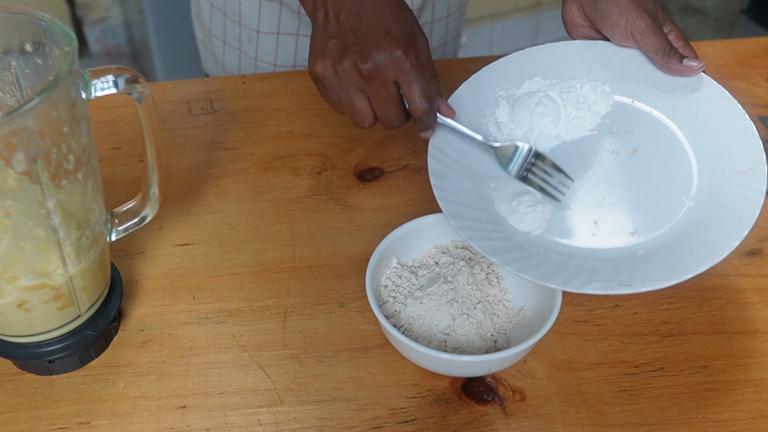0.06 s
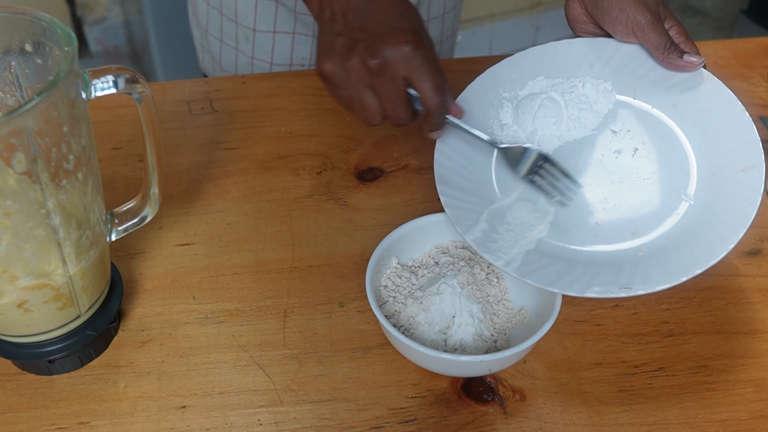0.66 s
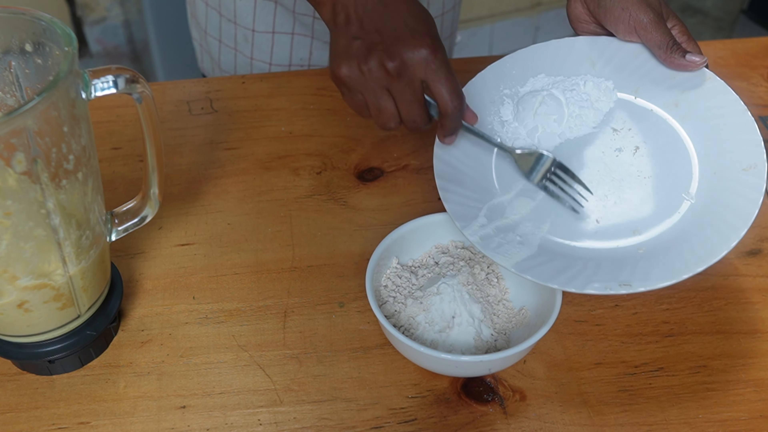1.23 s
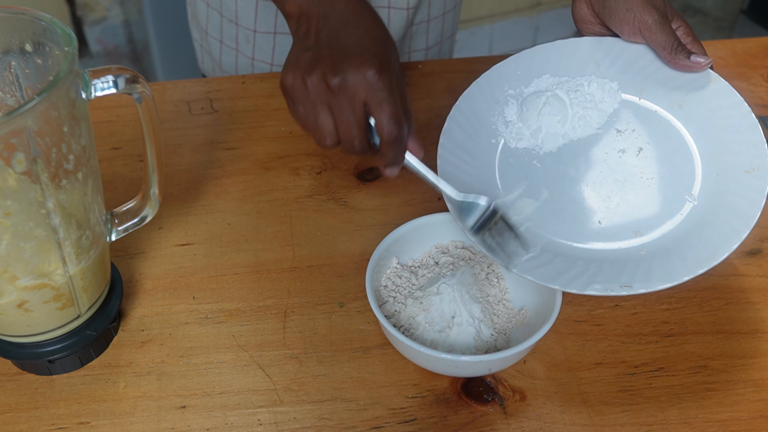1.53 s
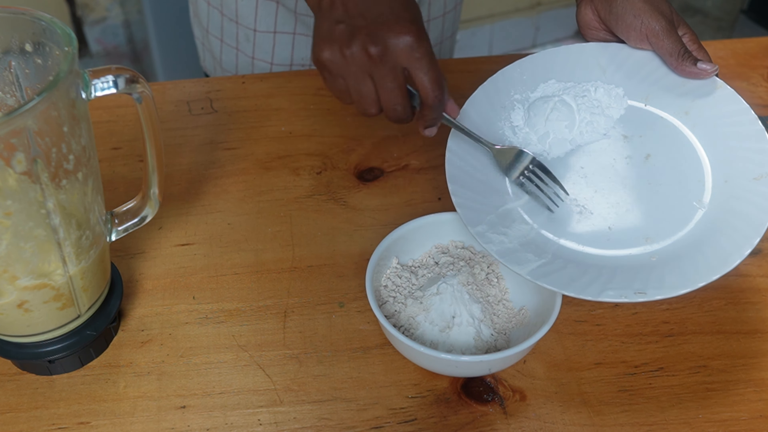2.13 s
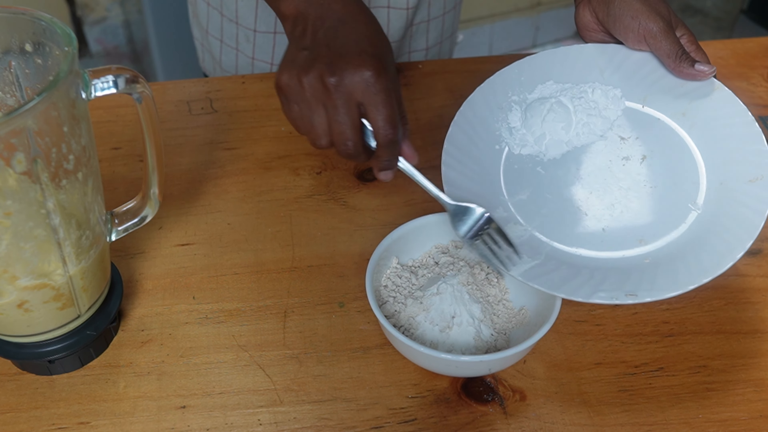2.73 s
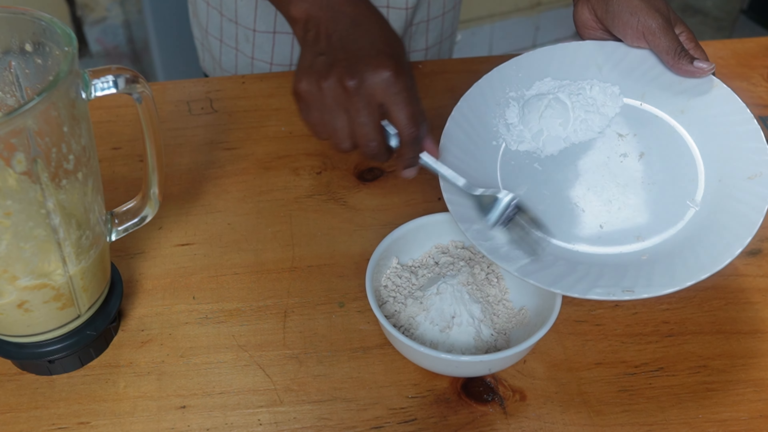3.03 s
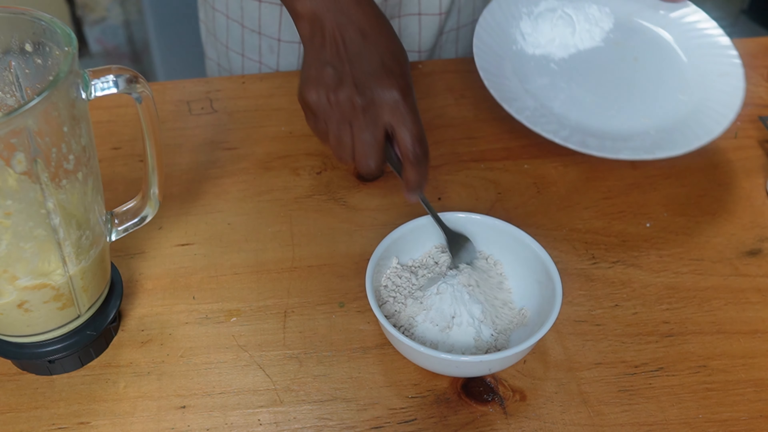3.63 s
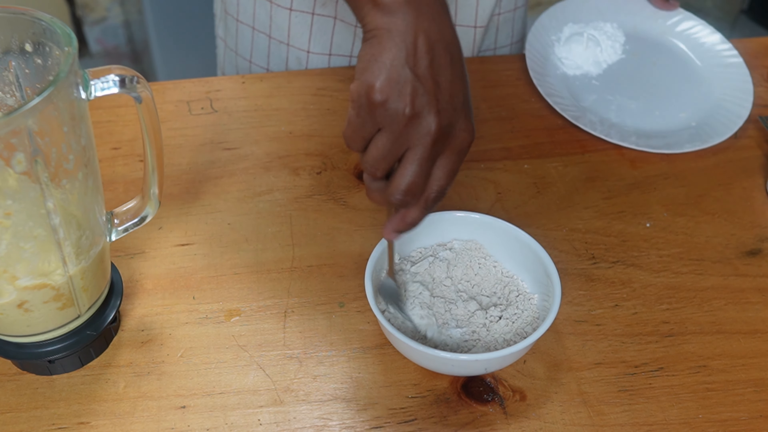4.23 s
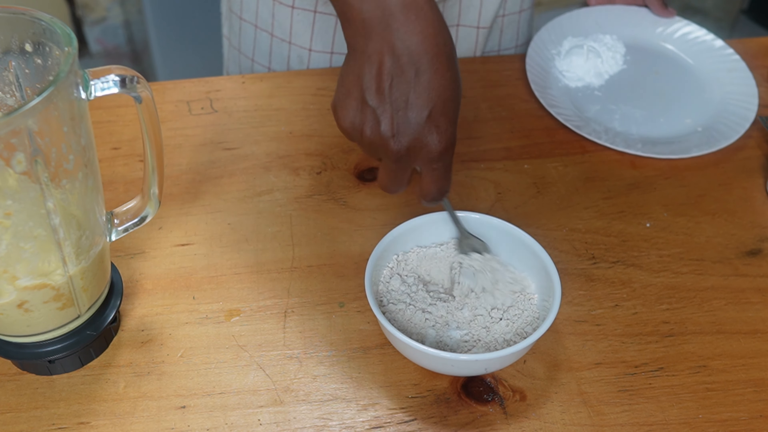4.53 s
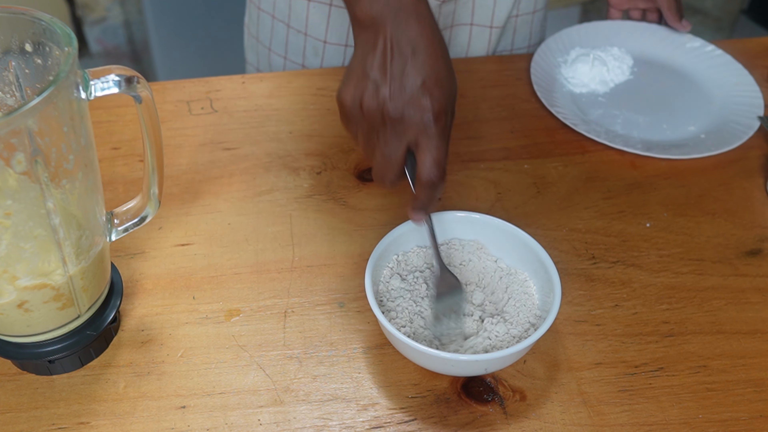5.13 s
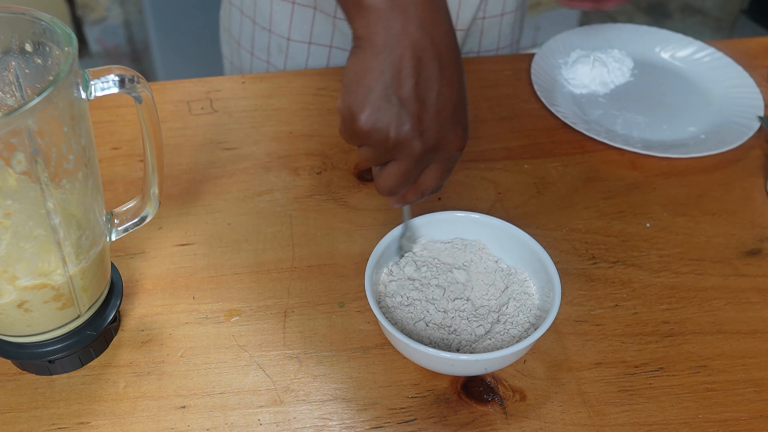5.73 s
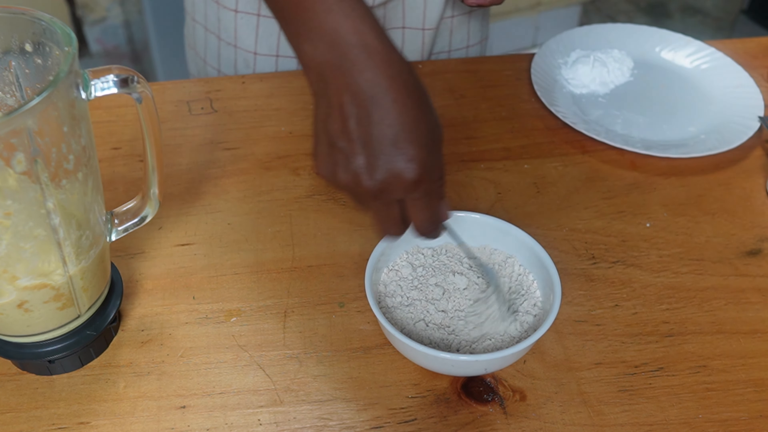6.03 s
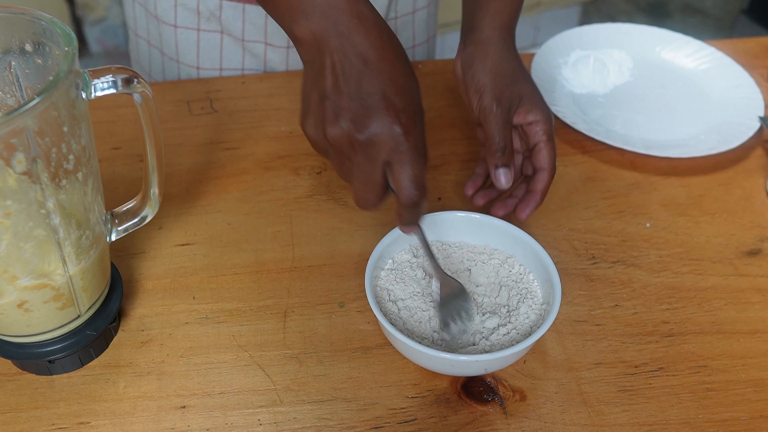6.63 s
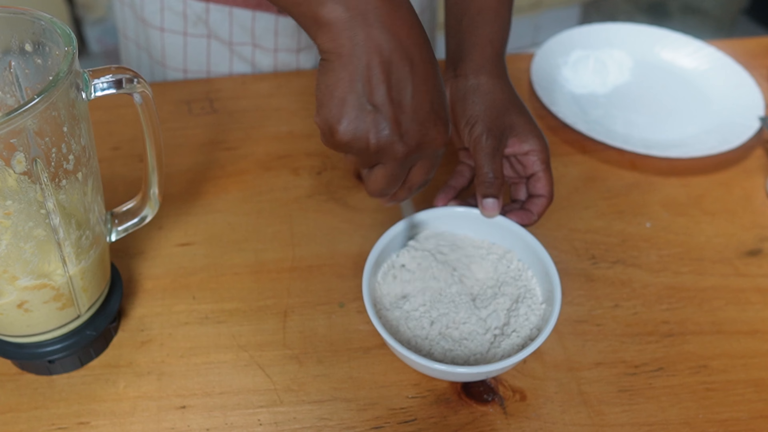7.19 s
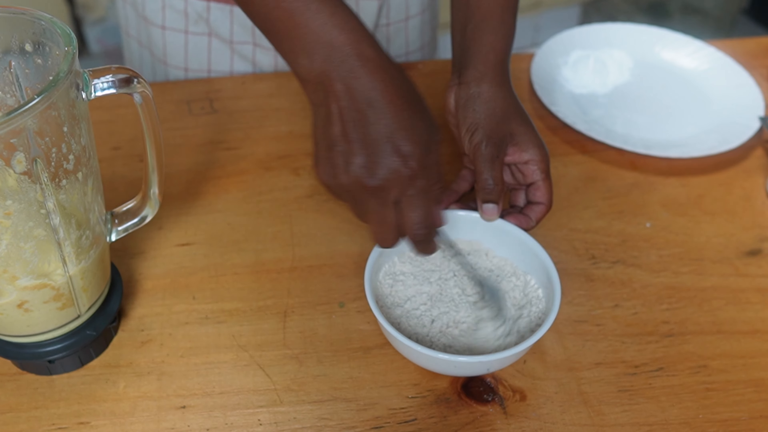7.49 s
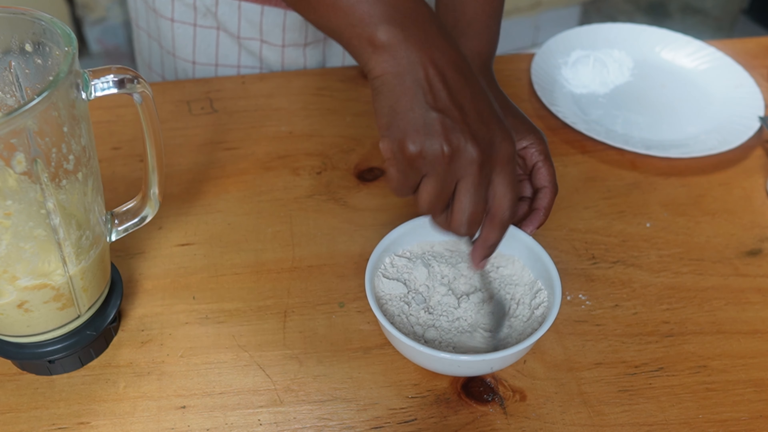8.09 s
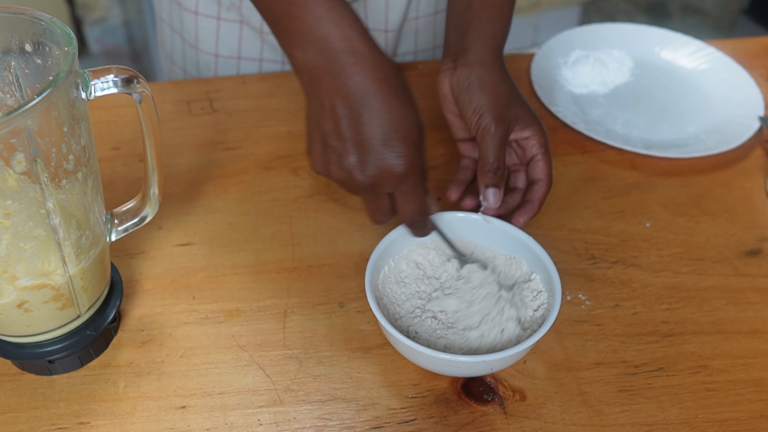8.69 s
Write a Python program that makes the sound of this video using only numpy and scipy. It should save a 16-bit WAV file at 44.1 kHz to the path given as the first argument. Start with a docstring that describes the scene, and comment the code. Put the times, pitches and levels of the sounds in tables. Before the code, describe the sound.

A metal fork knocks and scrapes flour off a ceramic plate, then stirs it in a bowl with clinks and squeaks.

```python
"""In a hard-walled kitchen, a metal fork pushes flour off a ceramic plate in short strokes,
each a knock and then a gritty, chattering scrape. The fork then stirs the flour in a bowl,
which knocks and shuffles on a wooden table; the tines tinkle and now and then stick and slip
on the glaze with a squeak. The walls answer, and a motor drones faintly far away."""
import sys
import numpy as np
from scipy import signal
from scipy.fft import rfft, irfft, next_fast_len
from scipy.io import wavfile
from scipy.ndimage import uniform_filter1d

SR = 44100
rng = np.random.default_rng(int(sys.argv[2]) if len(sys.argv) > 2 else 0)


def transcribe(signal):
    """Save signal, clipped to [-1, 1], as a 16-bit WAV file at the path in sys.argv[1]."""
    frames = np.atleast_2d(signal).T
    limited = np.clip(frames, -1, 1)
    pcm = np.round(limited * 32767).astype(np.int16)
    wavfile.write(sys.argv[1], SR, pcm)


N = 385875
TIME = np.arange(N) / SR
RING_TIME = TIME[:SR // 3]
STIR_FROM_S = 4.1

# The fork's ring. Each row: frequency in Hz, level in dB, seconds to fall 60 dB.
FORK_MODES = [(533, -12.5, 0.17), (1734, -10.5, 0.23), (2880, 8, 0.14), (3034, 4.5, 0.11),
              (3840, -7, 0.057), (4775, 0.5, 0.05), (5500, -12.5, 0.17), (6780, -10.5, 0.14),
              (8100, -17, 0.15), (9260, -23, 0.34), (10440, -9, 0.22), (12040, -24, .15), (13080, -22, .15),
              (14300, -26.5, 0.107)]
# The tone of a tine's attack. Each row: frequency in Hz, level in dB.
FORK_ATTACK = [(120, -25), (600, 1.5), (1300, 1), (2300, 6), (3000, 7.5), (4200, -14.5), (7000, -13.5),
               (11000, -20), (16000, -32)]


def plate_knocks(contact_s, ring_db):
    """The fork lands on the hand-held plate and sets it ringing."""
    # Each row: start in seconds, mid level in dB, bass and treble in dB against the mids.
    landings = [(0.066, -48.5, -0.5, -9), (0.772, -38.5, -11, -14.5), (1.309, -39.5, -9, -14),
                (1.767, -44.5, -7.5, -17), (2.204, -45, -16, -0.5), (2.591, -41.5, -11.5, -11.5),
                (2.991, -38.5, -22, -13.5), (3.147, -33.5, -18, -6)]
    # The plate's ring. Each row: frequency in Hz, level in dB, seconds to fall 60 dB.
    modes = [(345, -11.5, 0.31), (464.4, -8, 0.08), (592, 0.5, 0.055), (776, -3.5, 0.079), (1183, 1, 0.042),
             (1358, -1, 0.021), (1530, -2.5, 0.059), (1610, -20, 0.016), (1670, -22, 0.028),
             (2270, -9, 0.13), (2668, 1.5, 0.028), (2880, -15.5, 0.066), (3290, 0.5, 0.039),
             (5360, -53, 0.013), (6070, -28, 0.08), (6850, -14.5, 0.038), (8600, -23, .03)]
    # The tone of the attack. Each row: frequency in Hz, level in dB.
    attack = [(120, -104), (400, -15), (1200, -5.5), (2000, 7.5), (3300, -3), (5000, -6), (8000, -13.5),
              (16000, -29.5)]
    out = np.zeros(N)
    for s, db, bass_db, treble_db in landings:
        add(out, s, amp(db) * blow(modes, attack, contact_s, ring_db, bass_db, treble_db))
    return out


def plate_scrapes(jitter, flutter_db, fade_s, upper_ratio, upper_db):
    """Two tines chatter, each at its own pitch, over crunching flour; both grow towards the rim."""
    # Each row: landing, hardest push and lift in seconds, chatter and grit in dB at that push,
    # chatter pitch at the rim in Hz.
    strokes = [(0.07, 0.335, 0.39, -31, -37.5, 2780), (0.78, 0.98, 1.005, -39, -40.5, 2820),
               (1.32, 1.474, 1.56, -44, -45, 2760), (1.78, 1.927, 1.988, -36.5, -42, 2705),
               (2.21, 2.325, 2.39, -36.5, -40, 2750), (2.60, 2.70, 2.805, -38.5, -44, 2720),
               (3.15, 3.252, 3.285, -38, -39, 2690)]
    chatter_rise, chatter_fall, grit_rise, grit_fall = 162, 147, 81.5, 43   # dB per second
    skid_db, skid_s = -9.5, 0.024   # a puff of grit as the fork lands
    start_hz, glide_s = 1978, [0.05, 0.14]   # the pitch climbs between these times before the push
    chatter, grit, pitch = np.zeros((3, N))
    for lands, hardest, lifts, chatter_db, grit_db, rim_hz in strokes:
        on = slice(int(lands * SR), int((lifts + fade_s) * SR))
        before, after = np.maximum(hardest - TIME[on], 0), np.maximum(TIME[on] - hardest, 0)
        touching = np.clip((lifts - TIME[on]) / fade_s + 1, 0, 1)
        chatter[on] = touching * amp(chatter_db - chatter_rise * before - chatter_fall * after)
        grit[on] = touching * amp(grit_db - grit_rise * before - grit_fall * after)
        grit[on] += amp(grit_db + skid_db) * np.exp(-np.abs(TIME[on] - lands) / skid_s)
        pitch[on] = np.interp(before, glide_s, [rim_hz, start_hz])
    lower, upper = (np.sin(phase_of(ratio * pitch, jitter * drift(800))) * drift(500)
                    for ratio in (1, upper_ratio))
    tines = np.sqrt(2) * (lower + amp(upper_db) * upper)
    # The tone of the grit. Each row: frequency in Hz, level in dB.
    grit_tone = [(150, -31), (400, -11.5), (800, -4.5), (1700, -7), (2800, -7.5), (3600, -2), (4800, -7),
                 (7000, -8.5), (11500, -13.5), (16000, -20.5)]
    crunch = rms_one(colour(grains(2600, spread_db=1.5), grit_tone))
    grip = rms_one(amp(flutter_db * drift(160)))   # the tines catch and let go
    return grip * (chatter * tines + grit * crunch)


def squeaks(jitter, flutter_db, slip_rate):
    """A tine sticks and slips on the glaze: a harsh tone, unsteady in pitch and strength."""
    # Each row: centre and half length in seconds, pitch in Hz, level in dB,
    # octave and rasp in dB against the fundamental.
    slips = [(0.205, .015, 1807, -36, -7, -9.5), (0.27, .002, 2640, -23.5, -17, -7.5),
             (0.336, .006, 2740, -27, -11, -6.5), (0.381, 0.012, 3300, -31.5, -11, -3),
             (0.982, .008, 2750, -33, -14, -3), (2.318, .0015, 2690, -23, -20, -15),
             (2.33, .002, 2750, -24, -15, -6.5), (3.286, 0.0028, 2716, -28, -19, -22),
             (3.715, .018, 1007, -24, -14, -22), (4.031, 0.019, 1033, -25, -6.5, -19),
             (5.155, 0.018, 2630, -18.5, 4.5, -9.5), (5.137, .015, 2482, -27.5, 10, -6),
             (5.151, 0.0068, 2900, -22.5, -8.5, -5), (6.259, .03, 959, -50, -3, -16),
             (6.409, .009, 1061, -33, -2, -12.5), (6.459, .04, 1078, -47, 7, -9),
             (7.308, 0.019, 2700, -45.5, -2, -1), (7.82, .01, 1023, -42.5, -27, -20),
             (8.141, .004, 2097, -36, -23, -8), (8.466, .015, 2850, -39, -26, 0),
             (8.471, .002, 3760, -22, -18, -7.5)]
    # The tone of the rasp. Each row: frequency in Hz, level in dB.
    rasp_tone = [(300, -23), (1500, -7), (3000, 6.5), (5000, -0.5), (8000, -7), (13500, -6), (16000, -49)]
    tilt_db_per_khz = -5.5   # overtones fall away above the octave
    out, wander, grip = np.zeros(N), drift(slip_rate), amp(flutter_db * drift(420))
    for s, half, hz, db, octave_db, rasp_db in slips:
        on, force = swell(s, half)
        phase = phase_of(hz, jitter * wander[on])
        step_db = tilt_db_per_khz * hz / 1000
        overtones = sum(amp(octave_db + step_db * (k - 2)) * np.sin(k * phase) for k in range(2, 6))
        rasp = amp(rasp_db) * rms_one(colour(rng.standard_normal(len(phase)), rasp_tone))
        press = force * grip[on]
        press *= np.linalg.norm(force) / np.linalg.norm(press)
        out[on] += amp(db) * press * (np.sin(phase) + overtones + rasp)
    return out


def pressed_tines(friction, ring_db, damping_s):
    """Friction also shakes the fork's high modes, which die quickly while it is pressed down."""
    tines = band(ringing(FORK_MODES), 3900, "high", order=4) * np.exp(-RING_TIME / damping_s)
    return friction + amp(ring_db) * resonate(friction, tines)


def bowl_knocks(contact_s, ring_db, rock_s, rock_db):
    """The fork drives the bowl against the table; it rocks back more softly."""
    # Each row: start in seconds, mid level in dB, bass and treble in dB against the mids.
    knocks = [(3.67, -37.5, 2, -20), (3.681, -30.5, -9, -13.5), (3.832, -56.5, 10, -8),
              (3.948, -39, -2.5, -9), (4.065, -38, -4.5, -24), (4.8, -65, 16.5, -25),
              (4.86, -45.5, 1.5, -9.5), (5.367, -42, 0.5, -9.5), (6.767, -38, -6.5, -5),
              (6.921, -54, 6, -5.5), (7.566, -57.5, 3.5, -27), (7.9, -57.5, 11.5, -13),
              (8.159, -62, 11.5, -25)]
    # The bowl's ring. Each row: frequency in Hz, level in dB, seconds to fall 60 dB.
    modes = [(235.5, -2.5, 0.22), (322, -12.5, 0.037), (354, -3.5, 0.094), (519, -23, 0.35), (540, 1, 0.09),
             (619.4, 2.5, 0.074), (793, -25.5, 0.068), (843, 1.5, 0.077), (1054, -9, 0.1),
             (1920, -0.5, 0.022), (2210, -9, 0.046), (2840, -9, 0.029), (4110, -11.5, 0.03),
             (4294, -9.5, 0.055), (4520, -25.5, .04)]
    # The tone of the attack. Each row: frequency in Hz, level in dB.
    attack = [(40, -32), (100, -32), (220, 10.5), (600, 5.5), (1050, 1.5), (1450, -8.5), (2200, -5.5),
              (4200, -16), (6500, -33.5), (16000, -60.5)]
    out = np.zeros(N)
    for s, db, bass_db, treble_db in knocks:
        for delay_s, loss_db in (0, 0), (rock_s, rock_db):
            knock = blow(modes, attack, contact_s, ring_db, bass_db, treble_db)
            add(out, s + delay_s, amp(db + loss_db) * knock)
    return out


def bowl_shuffle(jitter, table_db, stir_push_db):
    """The bowl's foot slips in a nearly regular judder and drums on the table top."""
    # Each row: centre and half length in seconds, level in dB, slips per second.
    shuffles = [(1.747, 0.0054, -51, 160), (2.56, 0.0089, -51, 182), (5.163, .009, -36, 245),
                (5.241, .045, -35.5, 380), (5.291, .021, -45, 240), (5.455, 0.013, -36.5, 395),
                (6.253, 0.016, -46.5, 234), (7.293, .03, -46, 555), (7.61, .025, -40.5, 305),
                (7.988, 0.014, -36.5, 353), (8.159, 0.0438, -47, 240), (8.45, 0.083, -47, 179)]
    # The foot on the wood. Each row: frequency in Hz, level in dB, seconds to fall 60 dB.
    table_modes = [(195, -2.5, 0.23), (232, -11.5, 0.63), (333.5, -3, 0.097), (420, 4.5, 0.016),
                   (514, 4.5, 0.035), (565, -4, 0.038)]
    push = amp(stir_push_db) * (TIME > STIR_FROM_S)
    judder, wander = np.zeros(N), drift(150)
    for s, half, db, hz in shuffles:
        on, force = swell(s, half)
        push[on] += amp(db) * force
        judder[on] += amp(db) * force * np.sin(phase_of(hz, jitter * wander[on]))
    jerks = rms_one(grains(600, spread_db=-1.0)) * push
    return judder + amp(table_db) * resonate(jerks, ringing(table_modes))


def tine_clicks(contact_s, bass_db):
    """Pressed tines only click on the glaze; those that spring free ring on, each at its own pitch."""
    # Each row: start in seconds, mid level in dB, treble against mids in dB,
    # ring against attack in dB, tuning in Hz.
    clicks = [(4.412, -64.5, -0.5, -1, 3000), (4.63, -77, -8, 7, 3060), (4.981, -45, -1.5, -6.5, 3310),
              (5.07, -49.5, -19, -11, 2960), (5.805, -52, -2.5, 6.5, 3125), (5.824, -53, -9, 13, 3120),
              (6.207, -62, -14, -12, 2980), (7.059, -75, 7.5, 3, 3080), (7.234, -60, -2.5, 1, 2976),
              (7.285, -55, -7, 6, 2920), (7.433, -61, -16, 6, 2790), (7.956, -59, -7, -5, 2855),
              (8.135, -57, -7.5, -18, 3085), (8.332, -51, -9, -8, 3260), (8.434, -57, 7.5, -2, 3085)]
    home_hz = 3094   # the tuning that leaves the fork's modes unshifted
    out = np.zeros(N)
    for s, db, treble_db, ring_db, hz in clicks:
        modes = np.array(FORK_MODES) * [hz / home_hz, 1, 1]
        add(out, s, amp(db) * blow(modes, FORK_ATTACK, contact_s, ring_db, bass_db, treble_db))
    return out


def tinkles(per_s, level_db, spread_db, detune):
    """While the fork stirs, its tips brush the bowl at random and ring faintly and high."""
    out = np.zeros(N)
    for s in TIME[(rng.random(N) < per_s / SR) & (TIME > STIR_FROM_S)]:
        loud, sharp = rng.standard_normal(2)
        modes = np.array(FORK_MODES) * [1 + detune * sharp, 1, 1]
        touch = blow(modes, FORK_ATTACK, contact_s=.002, ring_db=0, bass_db=-12, treble_db=2.5)
        add(out, s, amp(level_db + spread_db * loud) * touch)
    return out


def flour(stir_db, ring_db):
    """Stirred powder rustles, soft and dense, and keeps the tines faintly singing."""
    # The fork digs deeper. Each row: centre and half length in seconds, level in dB.
    digs = [(4.165, 0.074, -54), (5.15, 0.14, -44.5), (6.462, .1, -48), (6.942, 0.15, -57),
            (7.699, 0.078, -50.5)]
    # The tone of the rustle. Each row: frequency in Hz, level in dB.
    rustle_tone = [(200, 1.5), (700, 9), (1500, 0), (2800, 0), (4500, 1), (7000, -10.5), (11000, -16.5),
                   (16000, -26)]
    depth = amp(stir_db) * (TIME > STIR_FROM_S)
    for s, half, db in digs:
        on, force = swell(s, half)
        depth[on] += amp(db) * force
    powder = grains(7000, spread_db=4.5)
    singing = rms_one(resonate(powder, ringing(FORK_MODES)))
    return depth * (rms_one(colour(powder, rustle_tone)) + amp(ring_db) * singing)


def kitchen(x, first_echo_s, build_s):
    """Dense wall echoes die at their own pace in each octave."""
    # Each row: frequency in Hz, seconds for the tail to fall 60 dB.
    decay_times = [(150, 1), (530, 0.19), (1100, 0.39), (2100, 0.35), (3500, 0.3), (8000, 0.29),
                   (15000, 0.21)]
    # Each row: frequency in Hz, reverb level in dB against its input.
    wet_levels = [(150, -6), (530, -4), (1400, 0), (3500, -2.5), (8000, 1), (15000, -1.5)]
    t = TIME[:SR * 3 // 4]
    noise, hz = rfft(diffuse(len(t))), np.fft.rfftfreq(len(t), 1 / SR)
    octave, response = np.log2(np.maximum(hz, 1)), 0
    build = np.clip((t - first_echo_s) / build_s, 0, 1)
    for centre in 125 * 2 ** np.arange(8):
        share = np.clip(1 - np.abs(octave - np.log2(centre)), 0, 1)
        decay = np.exp(-np.log(1000) * t / at_hz(decay_times, centre)) * build
        tail = irfft(noise * share, len(t)) * decay / np.linalg.norm(decay)
        response = response + tail * amp(at_hz(wet_levels, centre))
    return signal.fftconvolve(x[None], response, axes=1)[:, :N]


def motor(overtone_db, rumble_db):
    """A far motor drones low and uneven, slowly speeding up and dropping back near the end."""
    # Each row: time in seconds, pitch in Hz, level in dB, octave in dB against the fundamental.
    drone = [(0, 35, -79, 8), (4.0, 42, -80, 13), (5.15, 45, -53, -10), (6.5, 47, -56, -19),
             (7.2, 49, -58.5, 4), (7.8, 51, -64, 1), (7.9, 50, -74, 7), (8.2, 33.1, -75, 6),
             (8.75, 35.3, -62, 7.5)]
    s, hz, db, octave_db = np.transpose(drone)
    phase = phase_of(np.interp(TIME, s, hz), 0.0088 * drift(7.1))
    octave = amp(np.interp(TIME, s, octave_db)) * np.sin(2 * phase)
    overtones = sum(amp(overtone_db + rumble_db * drift(2)) * np.sin(k * phase) for k in range(3, 6))
    return amp(np.interp(TIME, s, db)) * np.sqrt(2) * (np.sin(phase) + octave + overtones)


def room_tone(level_db, waver_db):
    """A wavering rumble lies under a faint hiss."""
    # The tone of the air. Each row: frequency in Hz, level in dB.
    air_tone = [(15, -27), (25, -11.5), (166, -5), (200, -7), (309, -11), (344, -11), (489, -16),
                (1100, -22), (2480, -21), (3620, -25), (4250, -26), (5140, -29.5), (9070, -36.5),
                (10700, -36), (16000, -41)]
    # The hiss swells and eases. Each row: time in seconds, gain in dB.
    hiss_ride = [(0, -1.5), (1.7, 0.5), (3.0, 5), (3.6, 5.5), (4.5, 3.5), (8.75, 0.5)]
    air = amp(level_db) * rms_one(np.array([colour(side, air_tone) for side in diffuse(N)]))
    hiss = treble_above(air, 900)
    rumble = band(air - hiss, 48, "high") * amp(waver_db * drift(22))
    return rumble + hiss * amp(np.interp(TIME, *np.transpose(hiss_ride)))


def blow(modes, attack_tone, contact_s, ring_db, bass_db, treble_db):
    """A short crack plus the body's ring; the blow's weight and hardness set bass and treble."""
    contact = np.exp(-RING_TIME / contact_s) * (1 + RING_TIME / contact_s)   # the parts rattle briefly
    crack = colour(rng.standard_normal(len(RING_TIME)), attack_tone) * contact ** 2
    hit = rms_one(crack) + amp(ring_db) * rms_one(ringing(modes, vary_db=5))
    low = rms_one(band(hit, 700, "low", order=3))
    mid = rms_one(band(hit, [700, 4000], "band", order=3))
    high = rms_one(band(hit, 4000, "high", order=3))
    return mid + amp(bass_db) * low + amp(treble_db) * high


def ringing(modes, vary_db=2):
    """Dying sines; each contact point favours the modes differently."""
    hz, db, t60 = np.transpose(modes)[:, :, None]
    strength = amp(db + vary_db * rng.standard_normal(db.shape)) * rng.choice([-1, 1], db.shape)
    decay = np.exp(-np.log(1000) * RING_TIME / t60)
    return np.sum(strength * decay * np.sin(2 * np.pi * hz * RING_TIME), axis=0)


def resonate(x, ring):
    """Drive a body's ring with a signal."""
    return signal.fftconvolve(x, ring / np.linalg.norm(ring))[:N]


def grains(per_s, spread_db):
    """Tiny slips of unequal size at random moments."""
    sizes = amp(spread_db * np.minimum(rng.exponential(1, N), 4)) * rng.choice([-1, 1], N)
    return sizes * (rng.random(N) < per_s / SR)


def swell(centre, half):
    """The samples of a short gesture and its bell-shaped rise and fall."""
    on = slice(max(int((centre - 4 * half) * SR), 0), int((centre + 4 * half) * SR))
    return on, np.exp(-.5 * ((TIME[on] - centre) / half) ** 2)


def drift(rate):
    """Random wander of spread 1 with so many turns a second."""
    knots = rng.standard_normal(int(rate * N / SR) + 2)
    return rms_one(np.interp(TIME * rate, np.arange(len(knots)), knots))


def phase_of(hz, bend):
    """Running phase of a pitch bent by a changing fraction."""
    return 2 * np.pi * np.cumsum(hz * (1 + bend)) / SR


def diffuse(size):
    """Stereo noise from all sides: narrow in the bass, wide in the treble."""
    # Each row: frequency in Hz, side against mid in dB.
    width = [(60, -16.5), (500, -11), (1000, -10), (2000, -9), (4000, -5.5), (8000, -0.5), (15000, 2)]
    mid, side = rng.standard_normal((2, size))
    return mid + colour(side, width) * np.array([[1], [-1]])


def colour(x, spectrum):
    """Shape a signal with a smooth EQ curve."""
    size = next_fast_len(len(x))
    gain = amp(at_hz(spectrum, np.fft.rfftfreq(size, 1 / SR)))
    return irfft(rfft(x, size) * gain, size)[:len(x)]


def at_hz(points, hz):
    """Read a table on a log-frequency axis."""
    freqs, values = np.transpose(points)
    return np.interp(np.log(np.maximum(hz, 1)), np.log(freqs), values)


def band(x, hz, kind, order=2):
    """Causal Butterworth filter."""
    return signal.sosfilt(signal.butter(order, hz, kind, fs=SR, output="sos"), x)


def treble_above(x, hz):
    """Zero-phase high-pass."""
    return signal.sosfiltfilt(signal.butter(2, hz, "high", fs=SR, output="sos"), x)


def amp(db):
    """Decibels to gain."""
    return 10 ** (np.asarray(db) / 20)


def rms_one(x):
    """Scale to rms 1."""
    return x / np.sqrt(np.mean(x ** 2) + 1e-20)


def add(out, s, sound):
    """Mix a sound in at its moment."""
    start = int(s * SR)
    out[start:start + len(sound)] += sound[:N - start]


def suppress(x, threshold_db, depth_db, knee_db):
    """A noise suppressor turns the treble down once it grows faint, which shortens the tails."""
    treble = treble_above(x, 1200)
    power = uniform_filter1d(np.mean(treble ** 2, axis=0), size=900)
    level_db = 10 * np.log10(np.maximum(power, 1e-12))
    closed = .5 * (1 - np.tanh((level_db - threshold_db) / knee_db))
    return x - treble * (1 - amp(-depth_db * closed))


def scene():
    """The plate a little to the right, the bowl near the middle, all in the room."""
    knocks = plate_knocks(contact_s=0.0061, ring_db=-2.0)
    scrapes = plate_scrapes(jitter=0.0522, flutter_db=1.85, fade_s=0.0062, upper_ratio=1.4, upper_db=-6.5)
    bowl = bowl_knocks(contact_s=0.0059, ring_db=-1.5, rock_s=0.032, rock_db=-8)
    bowl += bowl_shuffle(jitter=0.07, table_db=-5, stir_push_db=-56.5)
    squeals = squeaks(jitter=0.0505, flutter_db=4.0, slip_rate=1400)
    scrapes = pressed_tines(scrapes, ring_db=-11, damping_s=0.0021)
    squeals = pressed_tines(squeals, ring_db=-12, damping_s=0.0053)
    fork = tine_clicks(contact_s=0.0046, bass_db=-10) + flour(stir_db=-68, ring_db=-22.5)
    bed = room_tone(level_db=-56.5, waver_db=2.5) + motor(overtone_db=-14, rumble_db=4.5)
    fork += tinkles(per_s=7.9, level_db=-75.5, spread_db=2.5, detune=0.03)
    plate_pan, bowl_pan = amp([[-0.59], [0.59]]), amp([[0.26], [-0.26]])
    direct = (knocks + scrapes) * plate_pan + (bowl + fork + squeals) * bowl_pan
    # the knocks excite the room more than the thin scrapes and squeals do
    send = knocks + bowl + fork + amp(-5.0) * (scrapes + squeals)
    return direct + kitchen(send, first_echo_s=0.0013, build_s=0.0075) + bed


def record(dry):
    """Faint treble is suppressed, peaks are rounded, the level dips twice; deep bass and top are cut."""
    # Each row: start and end of a brief dip in seconds.
    dips = [(3.097, 3.117), (7.829, 7.850)]
    dip_db, cutoff_hz = -25, 16000
    sound = suppress(dry, threshold_db=-39, depth_db=2.5, knee_db=6.0)
    sound = band(sound, 31, "high", order=4)
    sound = .8 * np.tanh(sound / .8)
    dipped = uniform_filter1d(sum(1.0 * ((TIME > a) & (TIME < b)) for a, b in dips), size=180)
    top_cut = signal.ellip(10, .2, 80, cutoff_hz, fs=SR, output="sos")
    return signal.sosfilt(top_cut, sound * amp(dip_db * dipped))


dry = scene()
out = record(dry)
transcribe(out)
```